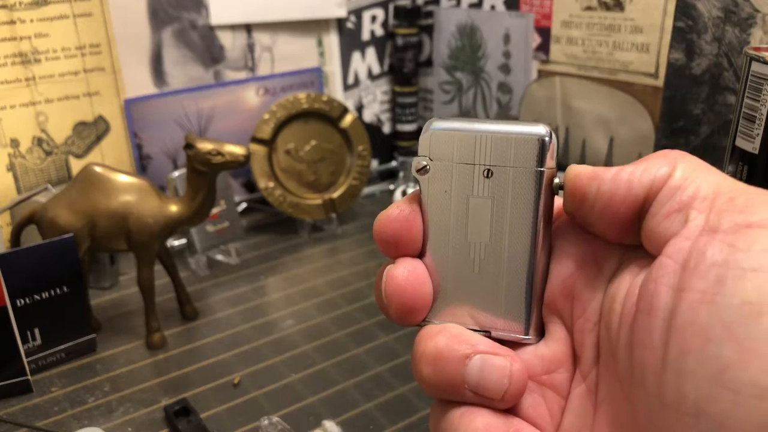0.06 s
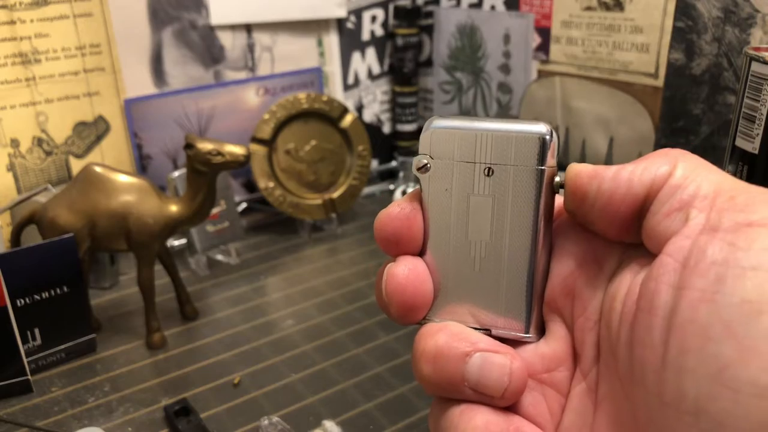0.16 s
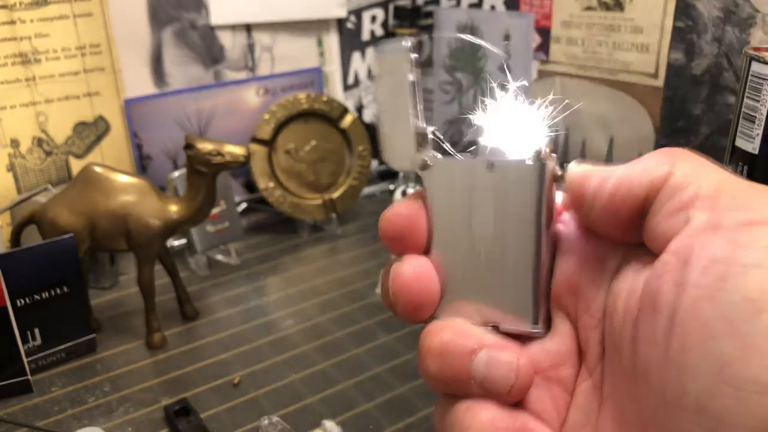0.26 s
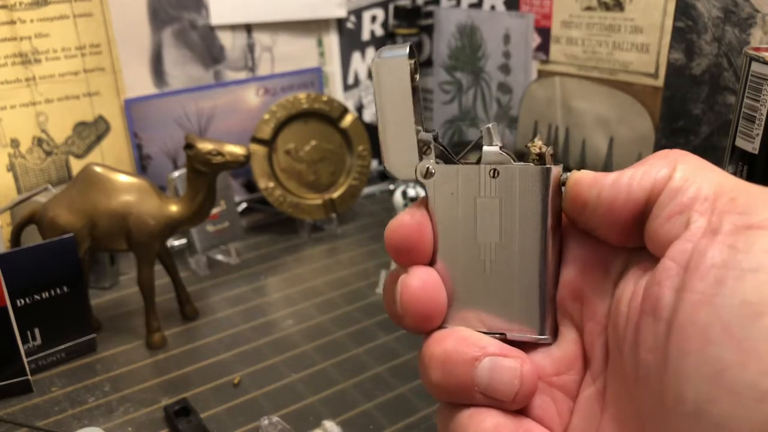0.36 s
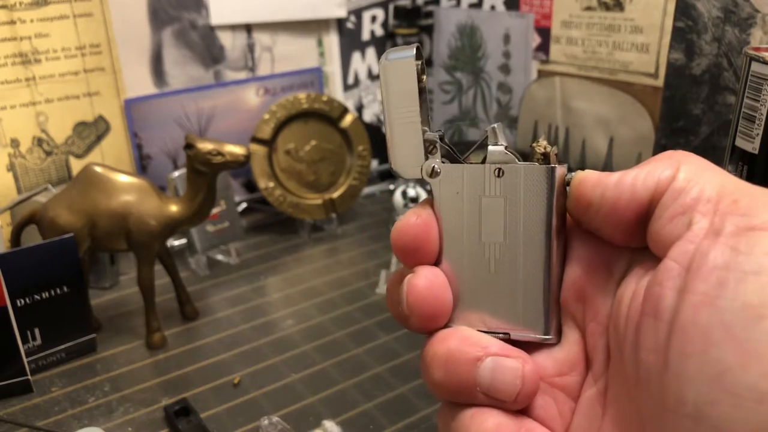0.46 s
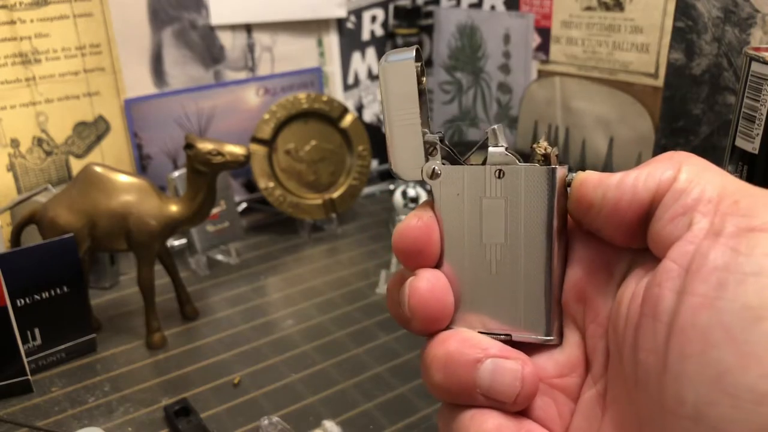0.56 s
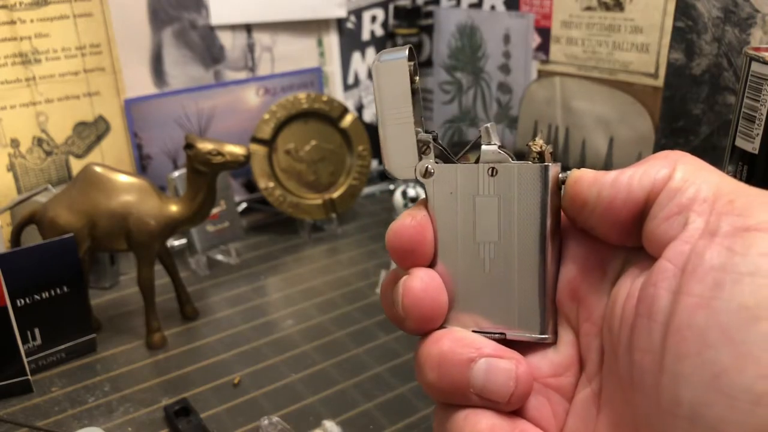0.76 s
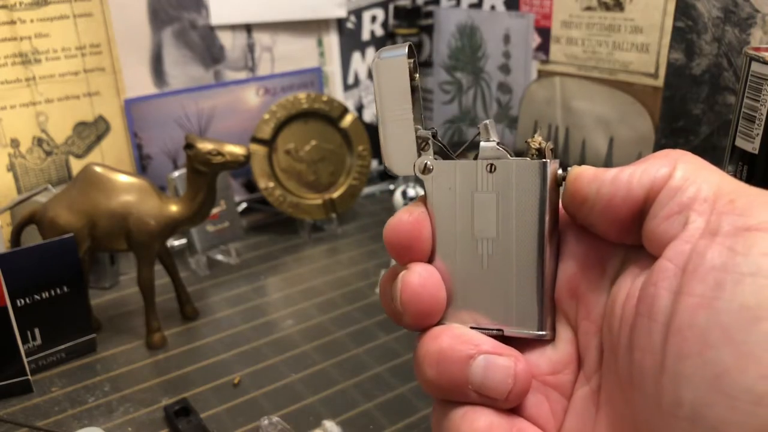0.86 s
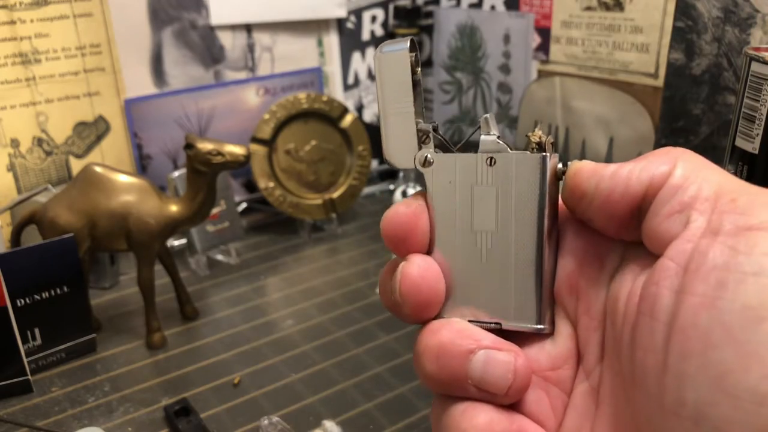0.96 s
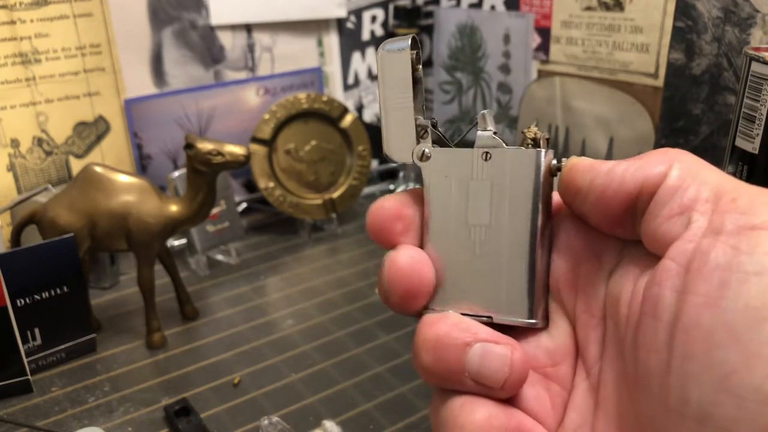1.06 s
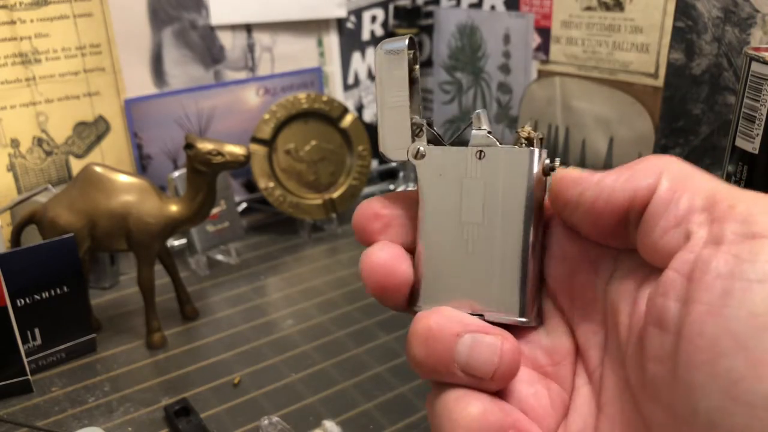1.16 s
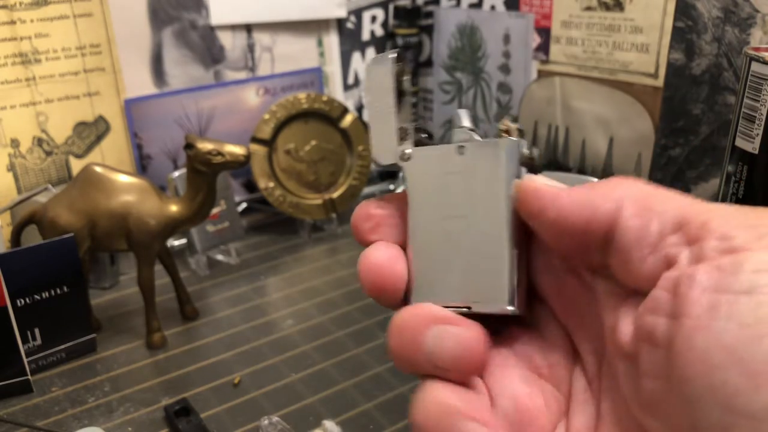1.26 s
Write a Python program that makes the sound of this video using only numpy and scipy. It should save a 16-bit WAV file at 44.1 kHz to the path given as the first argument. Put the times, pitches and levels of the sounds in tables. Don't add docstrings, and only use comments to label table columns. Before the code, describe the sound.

A metal lighter lid snaps open with one sharp, bright click over faint low room hum.

```python
import sys
import numpy as np
from scipy import signal
from scipy.fft import rfft, irfft
from scipy.io import wavfile

SR = 44100
rng = np.random.default_rng(int(sys.argv[2]) if len(sys.argv) > 2 else 0)


def elevation(decibels):
    levels = np.asarray(decibels, float)
    return 10 ** (levels / 20)


def persist_wave(psi):
    counts = np.round(np.clip(psi, -1, 1) * 32767).astype(np.int16)
    wavfile.write(sys.argv[1], SR, np.atleast_2d(counts).T)


N = 57330

# frequency in Hz, density in dB per Hz.
AIR_SPECTRUM = [(14, -16.5), (30, 4), (110, -19.5), (250, -29), (330, -31), (445, -40), (2000, -52.5),
                (14600, -62.5)]
# centre in Hz, width in Hz, level in dB.
HUM_BANDS = [(36, 12, -78.5), (63.1, 7.9, -59.5), (139.44, 15, -65), (166.4, 6.1, -69.5),
             (225.74, 22, -66.5), (486, 6.5, -87)]
# start in seconds, level in dB, contact time in ms.
CATCH_HITS = [
    (.2339, -20.5, 0.098),
    (.2351, -13, 0.11),
    (.2366, -23, .06),
    (.2376, -26.5, 0.14),
    (.2386, -11.5, 0.067),
    (.2399, -21, .06),
    (.2411, -26, 0.044),
    (.2423, -27, 0.099),
    (.2436, -26, 0.047),
]
# start in seconds, level in dB, contact time in ms.
LID_HITS = [
    (.2446, -6, 0.07),
    (.2457, -5.5, 0.15),
    (.2468, -13.5, 0.068),
    (.2476, -12.5, 0.2),
    (.2484, -15.5, 0.11),
    (.2497, -15.5, .06),
    (.2519, -21.5, 0.15),
    (.2537, -19.5, .08),
    (.2553, -18, 0.17),
    (.2582, -26, 0.041),
]
# frequency in Hz, level in dB, decay time T60 in seconds.
CATCH_MODES = [(1904, -28, .015), (2710, -28.5, 0.0033), (3203, -14.5, 0.036), (3930, 2, 0.0076),
               (5070, -7, .005), (6595, -2.5, 0.0026), (8504, -6, .009), (10480, -21, .008),
               (13390, -21.5, .005), (14400, -27.5, .005)]
# frequency in Hz, level in dB, decay time T60 in seconds.
LID_MODES = [(1579, -21, .015), (1898, -23, 0.017), (2547, -24.5, 0.0033), (3600, -13, 0.014),
             (4183, -3.5, 0.0099), (4907, 4, 0.0083), (5900, 0, 0.0076), (6400, -6, 0.0075),
             (6750, -7, 0.015), (7680, -6, 0.028), (8200, -4, 0.01), (10525, -13.5, 0.01),
             (11400, -15.5, .004), (12800, -7, .004), (15300, -12, 0.0039)]
# frequency in Hz, level in dB, decay time T60 in seconds.
HAND_MODES = [(50, -29, 0.039), (299.5, -40.5, 0.02), (536, -39.5, .04), (633, -41, 0.039),
              (767, -35.5, 0.033), (1150, -39.5, 0.024)]
# centre in Hz, level in dB, decay time T60 in seconds.
ROOM_BANDS = [(500, -20, 0.1), (750, -19.5, .28), (1100, -16.5, .3), (1600, -20.5, .32),
              (2200, -20.5, 0.26), (2850, -16, 0.17), (3600, -17, 0.26), (5724, -20, 0.29),
              (7130, -17, 0.25), (9830, -15, 0.15), (13480, -21.5, .19)]
# start in seconds, level in dB.
KNOCK_BUMPS = [
    (.619, -57.5),
    (.627, -62),
    (.638, -65.5),
    (1.293, -81),
]
# centre in Hz, width in Hz, level in dB.
KNOCK_BANDS = [(1208, 1200, -17), (1860, 440, -31), (2780, 683, -19.5), (4320, 1850, -26)]
# start in seconds, pitch in Hz, level in dB, decay time T60 in seconds.
TICKS = [
    (.783, 5100, -66, 0.0069),
    (.783, 4257, -71.5, 0.013),
    (.894, 5763, -73, 0.01),
    (1.264, 5500, -76, .009),
    (1.264, 3600, -74, .009),
    (1.263, 1000, -72.5, 0.0089),
    (1.280, 4450, -74, .008),
]

AIR_DB, AIR_TOP_HZ = -51.5, 14940
MOTOR_HZ, MOTOR_PEAK_DB, MOTOR_WOBBLE_DB = 95.35, -56, 3.5
SLIDE_S, SLIDE_LENGTH_S, SLIDE_HZ, SLIDE_DB = .2262, .007, 3600, -67.5
HAND_S = .2446
CATCH_CRACK_DB, LID_CRACK_DB, CRACK_MS = -9.5, -7, 0.37
CATCH_SPREAD_DB, LID_SPREAD_DB = 0.67, 1.5
BODY_LOW_HZ = 1287
SNAP_N = int(.33 * SR)
ROOM_RISE_S, ROOM_WIDTH = .004, 0.33
KNOCK_T60_S = 0.17
PHONE_TOP_HZ, FADE_IN_S = 15650, .012


def level(x, db):
    return x * elevation(db) / np.sqrt(np.mean(x ** 2))


def band(x, hz, width, order=2):
    edges = [max(hz - width / 2, 1), min(hz + width / 2, .49 * SR)]
    return signal.sosfilt(signal.butter(order, edges, "band", fs=SR, output="sos"), x)


def fade(start, t60):
    t = np.arange(N) / SR - start
    return (t >= 0) * np.exp(-np.log(1000) * np.maximum(t, 0) / t60)


def ring(force, hz, db, t60):
    pole = np.exp(2j * np.pi * hz / SR - np.log(1000) / (t60 * SR))
    return elevation(db) * signal.lfilter([1], [1, -pole], force).imag


def air():
    hz = np.maximum(np.fft.rfftfreq(N, 1 / SR), 1)
    table_hz, table_db = np.transpose(AIR_SPECTRUM)
    gain = elevation(np.interp(np.log(hz), np.log(table_hz), table_db)) * (hz < AIR_TOP_HZ)
    wide = irfft(rfft(rng.standard_normal(N)) * gain, N)

    hum = sum(level(band(rng.standard_normal(3 * N), f, width)[-N:], db) for f, width, db in HUM_BANDS)
    waver = level(band(rng.standard_normal(3 * N), 4, 8.1, order=3)[-N:], 0)
    motor_phase = 2 * np.pi * MOTOR_HZ * np.arange(N) / SR + 0.49 * waver
    motor = elevation(MOTOR_PEAK_DB + MOTOR_WOBBLE_DB * waver) * np.sin(motor_phase)
    return level(wide, AIR_DB) + hum + motor


def thumb_slide():
    t = np.arange(SNAP_N) / SR
    swell = np.clip((t - SLIDE_S) / SLIDE_LENGTH_S, 0, 1) * (t < SLIDE_S + SLIDE_LENGTH_S)
    return swell * level(band(rng.standard_normal(SNAP_N), SLIDE_HZ, 1800), SLIDE_DB)


def strike(hits, modes, crack_db, spread_db):
    t = np.arange(SNAP_N) / SR
    places = rng.standard_normal((len(hits), len(modes)))
    grit = band(rng.standard_normal(N), 8000, 13000)
    rows = []
    for (start, db, contact_ms), place in zip(hits, places):
        push = np.exp(-.5 * ((t - start) / (contact_ms / 4000)) ** 2)
        push = push / push.sum() * elevation(db) / 2
        body = np.zeros(SNAP_N)
        for k, (hz, mode_db, t60) in enumerate(modes):
            sign = (-1) ** k
            body += sign * ring(push, hz, mode_db + spread_db * place[k], t60)
        crack_fade = fade(start, np.log(1000) * CRACK_MS / 1000)
        crack = elevation(db + crack_db) * grit * crack_fade
        rows.append(body + crack[:SNAP_N])
    high_pass = signal.butter(2, BODY_LOW_HZ, "high", fs=SR, output="sos")
    return list(signal.sosfilt(high_pass, rows))


def catch():
    return strike(CATCH_HITS, CATCH_MODES, CATCH_CRACK_DB, CATCH_SPREAD_DB)


def hand_jolt():
    t = np.arange(SNAP_N) / SR
    jolt = np.exp(-.5 * ((t - HAND_S) / .00015) ** 2)
    return sum(ring(jolt / jolt.sum(), *mode) for mode in HAND_MODES)


def lid():
    return strike(LID_HITS, LID_MODES, LID_CRACK_DB, LID_SPREAD_DB)


def room(contacts):
    t = np.arange(N // 2) / SR
    rise = np.clip(t / ROOM_RISE_S, 0, 1) * 2
    noises, falls = [], []
    for hz, db, t60 in ROOM_BANDS:
        noises.append(band(rng.standard_normal(N), hz, ROOM_WIDTH * hz, order=3))
        falls.append(elevation(db) * fade(0, t60)[:len(t)] / np.sqrt(t60 * SR / 14) * rise)
    noises, falls = np.array(noises), np.array(falls)
    starts = rng.integers(0, N - len(t), len(contacts))
    wet = 0
    for contact, start in zip(contacts, starts):
        echo = (noises[:, start:start + len(t)] * falls).sum(axis=0)
        wet = wet + signal.fftconvolve(contact, echo)
    return np.pad(wet, (0, N))[:N]


def knock():
    shape = sum(elevation(db) * fade(start, KNOCK_T60_S) for start, db in KNOCK_BUMPS)
    return shape * sum(level(band(rng.standard_normal(N), hz, width), db) for hz, width, db in KNOCK_BANDS)


def ticks():
    t = np.arange(N) / SR
    return sum(elevation(db) * fade(start, t60) * np.sin(2 * np.pi * hz * (t - start))
               for start, hz, db, t60 in TICKS)


def scene():
    contacts = [thumb_slide() + hand_jolt()] + catch() + lid()
    near = np.pad(sum(contacts), (0, N))[:N]
    return (near + room(contacts) + knock() + ticks() + air())[None, :]


def band_limit(x):
    return signal.sosfilt(signal.butter(12, 16440, fs=SR, output="sos"), x)


def record(dry):
    fade_in = np.clip(np.arange(N) / SR / FADE_IN_S, 0, 1)
    low_pass = signal.cheby1(10, .5, PHONE_TOP_HZ, fs=SR, output="sos")
    mix = signal.sosfilt(low_pass, dry * fade_in)
    return band_limit(mix)


dry = scene()
out = record(dry)
persist_wave(out)
```